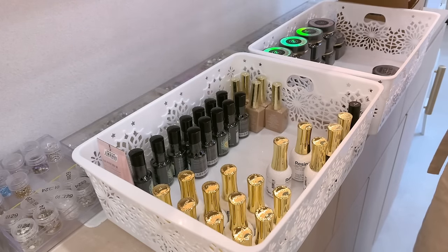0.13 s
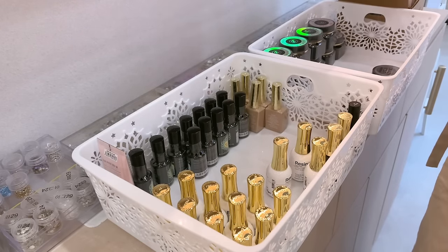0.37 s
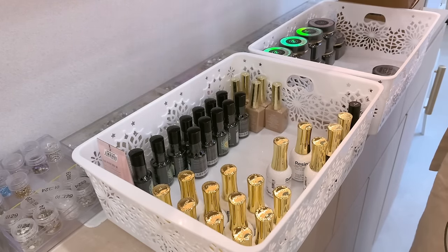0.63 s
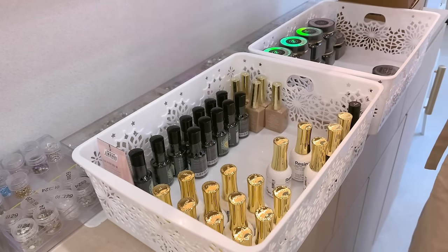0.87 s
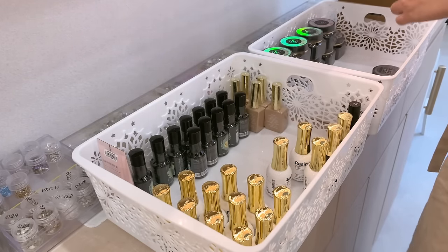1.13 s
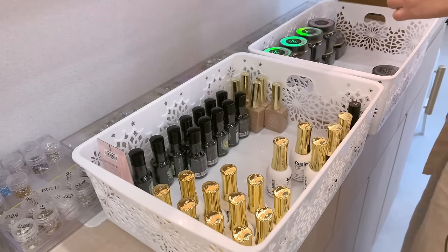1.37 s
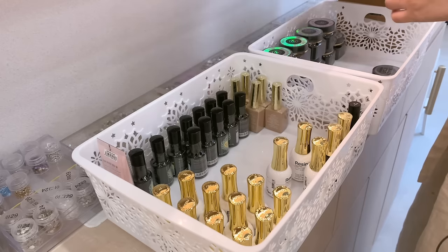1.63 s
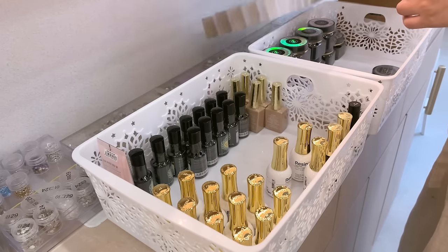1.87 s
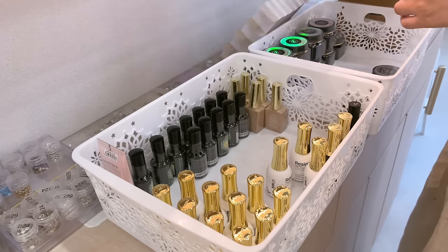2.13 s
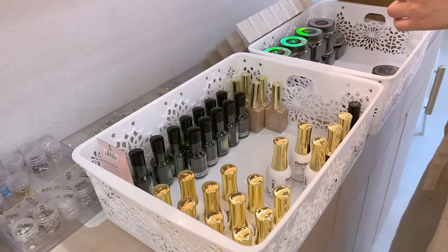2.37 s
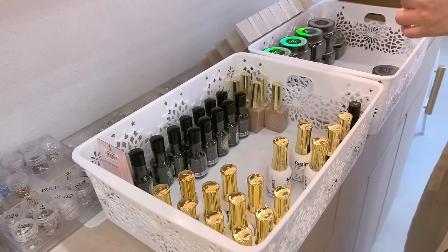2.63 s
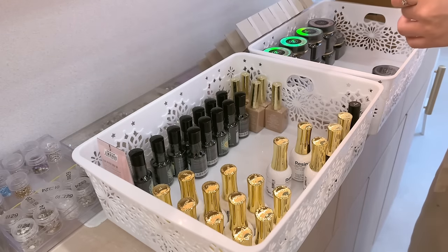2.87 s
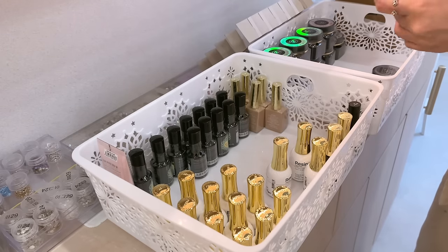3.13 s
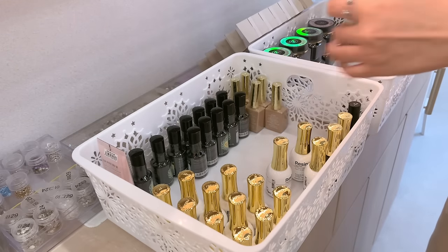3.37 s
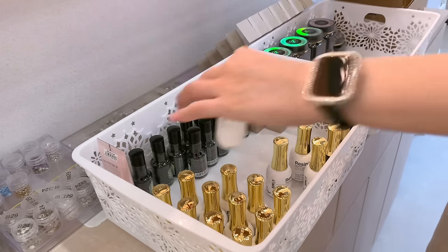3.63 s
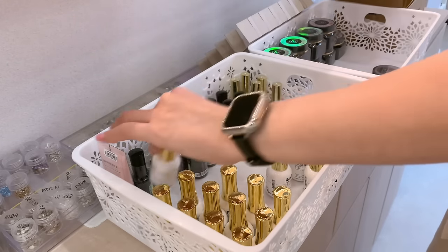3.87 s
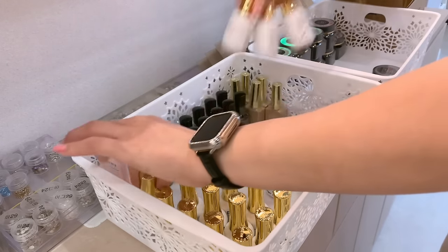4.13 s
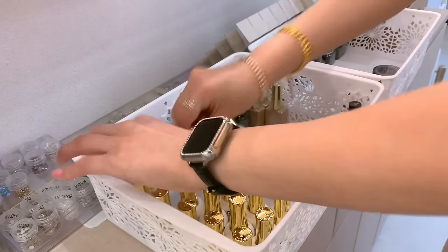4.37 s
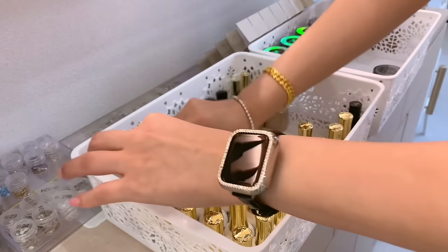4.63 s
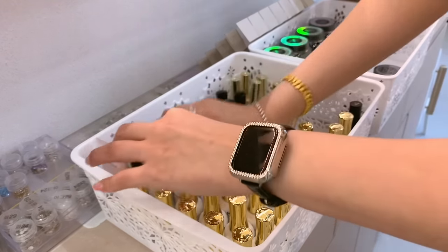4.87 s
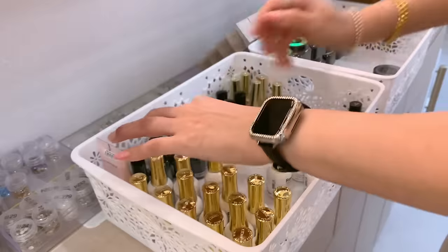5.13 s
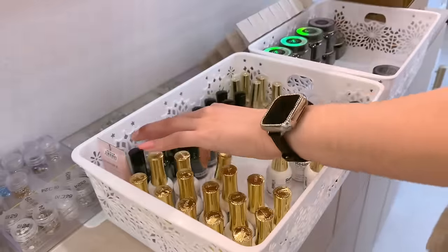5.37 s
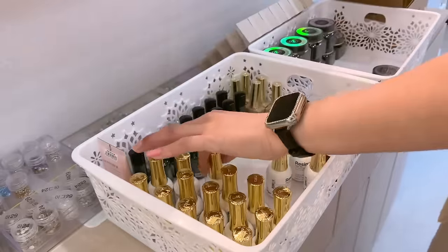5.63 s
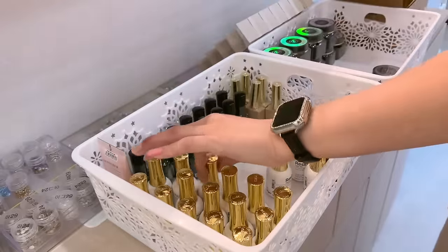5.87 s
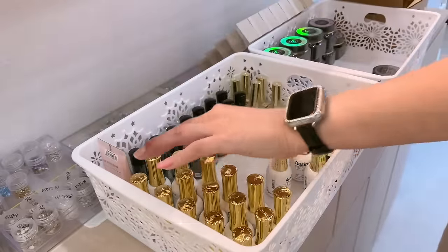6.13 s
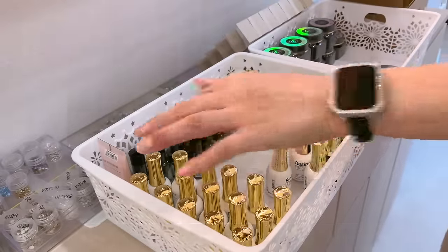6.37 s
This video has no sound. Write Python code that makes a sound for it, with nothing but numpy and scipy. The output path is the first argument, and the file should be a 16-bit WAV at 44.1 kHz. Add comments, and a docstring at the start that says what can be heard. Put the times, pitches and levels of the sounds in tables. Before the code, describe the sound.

Small thick glass bottles clink lightly during rustling and dull carton bumps, then clatter loudly into a plastic basket, followed by quieter ticks and handling.

```python
"""Glass bottles into a basket

Small thick glass bottles are taken from a carton and set down in a plastic basket, close to a phone.
Glass ticks, carton and basket knocks and counter thuds are noisy contacts ringing banks of resonances.
Hands and packing rustle as gated, coloured noise with small glassy ticks; some slides squeak.
A small hard room answers with a diffuse tail, over quiet air and rumble. The loudest knocks overload the input.
"""
import sys
import numpy as np
from scipy import signal
from scipy.fft import rfft, irfft, next_fast_len
from scipy.io import wavfile
from scipy.ndimage import uniform_filter1d, map_coordinates

SR = 44100
rng = np.random.default_rng(int(sys.argv[2]) if len(sys.argv) > 2 else 0)


def invert_db(level):
    """Linear amplitude ratio for a level in decibels (20 dB per decade), elementwise."""
    return 10 ** (np.asarray(level, dtype=float) / 20)


def master(y):
    """Save y as 16-bit WAV."""
    cut = np.clip(np.atleast_2d(y).T, -1, 1)
    pcm = np.round(cut * 32767)  # scale
    wavfile.write(sys.argv[1], SR, pcm.astype(np.int16))


N = 286800  # length of the scene [samples]
BLOW = 8192  # room for one blow to ring [samples]

# clear ticks of glass on glass:
# (time [s], peak before sheen [dB], favoured pitch [Hz], sheen peak over body peak [dB])
CLINKS = [(0.1036, -29, 3560, -17), (0.3129, -16, 2624, -30.5), (0.3577, -21.5, 3330, -25.5),
          (0.5007, -23, 3130, -48), (0.515, -24.5, 3130, -31), (0.6038, -40.5, 2370, 16.5),
          (1.1998, -18.5, 3320, -40), (1.2432, -22.5, 2400, -34), (1.3313, -25, 3300, -39),
          (1.374, -39, 5850, -5), (1.389, -27.5, 3300, -52), (1.585, -35.5, 3400, -14),
          (1.979, -27.5, 3730, -17), (2.391, -33, 4160, -36), (2.608, -26.5, 2460, -17.5),
          (2.7161, -19.5, 2840, -35), (2.7374, -29.5, 2510, -15), (2.987, -25, 3240, -38),
          (3.011, -27, 3290, -39), (3.0781, -7, 3580, -7.5), (3.098, -17.5, 3400, -29),
          (3.2047, -15, 3400, -32), (3.336, -18.5, 3180, -32), (3.9764, -39.5, 3300, -26),
          (4.0234, -6, 3330, -46), (4.0687, -11.5, 4460, -43.5), (4.093, -21, 4330, -36.5),
          (4.18, -32, 2750, -47.5), (4.262, -16, 2860, -31.5), (4.2729, -11, 2930, -8),
          (4.3023, -21.5, 5330, -15.5), (4.356, -7.5, 3750, -36.5), (4.3656, -10.5, 3370, -32),
          (4.3788, -7.5, 3170, -45), (4.3976, -18.5, 2480, -25.5), (4.4063, -17, 2780, -5.5),
          (4.426, -26, 3400, -12), (4.4393, -20.5, 3040, -29), (4.4721, -21.5, 3360, -24.5),
          (4.4851, -21.5, 3720, -16), (4.5095, -9, 4140, -14.5), (4.5424, -39, 5450, -5.5),
          (4.585, -21.5, 3120, -35), (4.6579, -0.5, 2415, -6.5), (4.7153, -11.5, 4680, -6.5),
          (4.7503, -9, 3190, -23.5), (4.7702, -8.5, 2600, -6), (4.7853, -26.5, 2660, -8.5),
          (4.8912, -6.5, 3550, -17.5), (4.9018, -16, 3200, -31), (4.9219, -19, 3380, -31.5),
          (4.9504, -21.5, 3250, -29), (5.0627, -18.5, 4500, -12), (5.0817, -36, 3270, -33),
          (5.1275, -31.5, 3290, -32), (5.1602, -32, 2280, -17), (5.3375, -35, 3290, -35),
          (5.36, -30, 2980, -22), (5.3764, -34, 2860, -33.5), (5.4018, -38.5, 3200, -37),
          (5.4583, -26, 3200, -29), (5.7879, -18.5, 2350, -28), (5.8216, -11, 2870, -20.5),
          (5.8452, -19, 2740, -33), (5.9587, -22, 3270, -26), (6.0568, -25.5, 3360, -25),
          (6.1756, -23.5, 3540, -32.5), (6.1988, -27, 3330, -29)]
# carton bumped on the counter: (time [s], peak level [dB], favoured pitch [Hz], contact time [ms])
CARTON_KNOCKS = [(0.149, -27.5, 409, 1.9), (0.283, -20, 409, 3.4), (0.313, -17.5, 395, 7.4),
                 (0.429, -14.5, 409, 9.4), (0.514, -20, 696, 14), (0.562, 0, 614, 1.7),
                 (1.247, -22.5, 420, 4.1), (1.658, -26, 448, 8.1), (1.925, -29, 437, 9.1),
                 (1.981, -30, 371, 13), (2.059, -20.5, 470, 1.8), (2.201, -26.5, 646, 10),
                 (2.32, -33.5, 253, 5.2), (2.391, -22, 526, 6.1), (2.426, -27, 560, 9.2),
                 (2.456, -24.5, 250, 9.9), (2.477, -25.5, 358, 2.4), (2.505, -20.5, 684, 7),
                 (2.647, -20, 420, 2.5), (2.819, -28.5, 568, 2.4), (3.095, -15.5, 417, 1.9),
                 (3.202, -24, 433, 4.7), (3.397, -22.5, 464, 3.3), (3.42, -28, 427, 16)]
# bottles landing on the basket floor: (time [s], peak level [dB], favoured pitch [Hz], contact time [ms])
BASKET_KNOCKS = [(4.023, -22, 326, 18), (4.271, -8, 580, 11), (4.357, -16, 322, 13), (4.382, -1, 384, 4.3),
                 (4.407, -2.5, 626, 9.2), (4.488, -17, 346, 2.2), (4.658, 14, 664, 4.7),
                 (4.715, 2.5, 645, 9.1), (4.77, 6.5, 670, 3.9), (4.946, -20, 250, 8.3),
                 (4.991, -20.5, 296, 12), (5.061, -22, 581, 6.3), (5.158, -28, 281, 9.5),
                 (5.644, -27, 670, 11.6), (5.859, -15.5, 600, 7.8), (6.045, -30, 355, 4.3),
                 (6.327, -33.5, 1060, 9.2)]
# weight coming down on the counter: (time [s], peak level [dB])
COUNTER_THUDS = [(0.225, -27.5), (0.282, -13), (0.312, -12), (0.429, -19.5), (0.514, -22.5), (1.07, -27.5),
                 (1.247, -27.5), (1.658, -25.5), (2.059, -30.5), (2.456, -18.5), (4.023, -22.5),
                 (4.271, -19.5), (4.381, -16), (4.487, -25), (4.715, -14.5), (4.77, -18), (5.06, -27.5),
                 (5.859, -27), (6.327, -27)]

# resonances of each body, levels relative: (centre [Hz], width [Hz], level [dB])
GLASS_MODES = [(1450, 1100, -6), (2350, 565, -3), (3290, 370, 1.5), (4050, 650, -2), (4765, 930, -2.5),
               (5850, 1450, -3.5), (6780, 1400, -9)]
CARTON_MODES = [(260, 360, -29), (421.4, 36, 8.5), (560, 253, 6), (689, 270, 6.5), (844, 30, -10.5),
                (1305, 40, -32), (1610, 390, -19.5), (2300, 270, -12.5)]
BASKET_MODES = [(250, 70, -2.5), (365, 62, 0), (670, 74, 0), (1014, 120, -8), (1155, 76, -9),
                (1610, 70, -5), (2230, 300, -31.5)]
COUNTER_MODES = [(148.3, 87, 0)]
# broad treble that brightens a clink: (centre [Hz], width [Hz], level [dB])
SHEEN_MODES = [(9550, 7300, 0.16), (13500, 1700, -1.6)]

# strokes of hands and packing rubbing: (time [s], length [ms], starting scrape level [dB])
RUB_STROKES = [(0, 34.5, -38.5), (0.026, 110, -51), (0.127, 53, -44), (0.191, 54, -52.5),
               (0.264, 41, -38.5), (0.312, 17.8, -26.5), (0.334, 90, -41.5), (0.425, 26, -36),
               (0.483, 65, -36.5), (0.557, 27, -33.5), (0.61, 480, -64.5), (1.01, 38, -58),
               (1.045, 47, -35.5), (1.088, 99, -42), (1.655, 22, -46.5), (1.692, 121, -46.5),
               (1.925, 406, -59.5), (1.961, 75, -44), (2.042, 64, -43.5), (2.139, 63, -47),
               (2.2, 114, -54.5), (2.389, 17.5, -35), (2.41, 1120, -60), (2.428, 120, -42.5),
               (2.563, 140, -43), (2.7, 81, -50.5), (2.77, 87, -54.5), (2.87, 200, -50.5), (3.09, 37, -48),
               (3.22, 183, -57.5), (3.4, 65, -45), (3.462, 66, -40.5), (4.356, 60, -33), (4.558, 17, -35.5),
               (4.743, 13, -22), (4.9, 53, -39.5), (4.947, 26, -43.5), (5.243, 24.2, -45),
               (5.641, 11.4, -29.5), (5.705, 19.2, -39), (5.777, 50.5, -40), (5.822, 33, -33),
               (5.861, 58, -41.5), (5.912, 91, -51), (6.034, 90, -43), (6.205, 138, -49.5),
               (6.326, 36, -45.5)]
# extra treble hiss in the rubbing: (time [s], length [ms], starting hiss level [dB])
EXTRA_HISS = [(0.126, 51, -53), (1.17, 25, -54), (1.621, 52, -48.5), (2.77, 84, -59.5), (3.462, 64, -54),
              (4.4, 38, -54), (4.9, 53, -50.5), (5.861, 57, -51), (6.035, 82, -58)]
# things dragged over the counter: (time [s], length [ms], starting drag level [dB])
DRAGS = [(0.334, 53, -28.5), (0.44, 54, -45), (0.557, 24, -20.5), (1.176, 38, -38.5), (1.696, 13, -32),
         (2.056, 52, -45.5), (2.238, 70, -41.5), (2.428, 120, -31.5), (2.563, 130, -39), (2.982, 220, -44),
         (3.35, 87, -35.5), (4.947, 41, -36), (5.24, 90, -50), (5.36, 110, -45.5), (5.704, 27, -37.5),
         (5.912, 110, -43), (6.114, 88, -44), (6.325, 43, -37)]
# squeaky slides: (time [s], length [ms], pitch [Hz], level [dB])
SQUEAKS = [(2.87, 220, 2460, -51.5), (3.458, 79, 880, -42.5), (4.561, 14.7, 2580, -31),
           (4.746, 5.95, 3100, -22.5), (6.235, 87, 1078, -47.5), (6.327, 27, 1040, -38)]

# noise colours, levels relative: (frequency [Hz], level [dB])
SCRAPE_COLOUR = [(700, -29.5), (1300, -1.5), (2400, -0.5), (3400, -4.5), (5400, -9.5), (7500, -23),
                 (11000, -40.5)]
HISS_COLOUR = [(3500, -46), (7000, -5), (10000, -7.5), (15000, -9.5), (16500, -28)]
DRAG_COLOUR = [(70, -50.5), (140, -1), (290, -5), (430, 3.5), (580, 1.5), (750, -6.5), (950, -3),
               (1250, -5.5), (3000, -66.5)]
AIR_COLOUR = [(88, -29.5), (150, -5), (222, -16.5), (309, -21), (466, -23), (905, -24), (1290, -34),
              (1690, -37.5), (3620, -46), (16000, -62)]
RUMBLE_COLOUR = [(1, 10.5), (3, 21.5), (8, 13), (30, 0.5), (60, -1.5), (80, -13.5), (120, -8), (250, -48.5)]
# colour of the echo as it starts, levels relative: (frequency [Hz], level [dB])
WALL_COLOUR = [(150, 4), (300, -1), (900, -5), (1500, -3), (4000, -7), (7000, -6.5), (11000, -9.5)]
# how long the room rings: (frequency [Hz], time to fall by 60 dB [s])
ROOM_DECAY = [(150, 0.67), (700, 0.85), (2500, 0.74), (6000, 0.54), (14000, 0.6)]


def unit(x):
    """Scale to rms 1."""
    return x / np.sqrt(np.mean(x ** 2) + 1e-20)


def along(points, hz):
    """Read a curve of (frequency, value) points on a log frequency axis."""
    f, value = np.transpose(points)
    return np.interp(np.log(hz + 1), np.log(f + 1), value)


def wobble(rate):
    """A smooth random curve with rate knots a second."""
    knots = rng.standard_normal(int(N * rate / SR) + 4)
    return map_coordinates(knots, [np.arange(N) * rate / SR])


def noise(colour):
    """Noise of rms 1, filtered to a colour."""
    m = next_fast_len(N)
    gain = invert_db(along(colour, np.fft.rfftfreq(m, 1 / SR)))
    return unit(irfft(rfft(rng.standard_normal(m)) * gain, m)[:N])


def chatter(ms, shape, rise, snap, linger_db, count):
    """A few ms of uneven contact with a weaker rattle after it, evened out over pitch count times."""
    u = np.arange(BLOW // 4) / SR * 1000 / max(ms, .5)  # time in contact times
    envelope = u ** rise * (np.exp(-u ** shape) + invert_db(linger_db) * np.exp(-u / 6.2))
    push = envelope * rng.standard_normal(len(u))
    push[0] += snap  # first sharp touch
    for _ in range(count):
        spectrum = rfft(push)
        flat = irfft(spectrum / (np.abs(spectrum) + 1e-9), len(u))
        push = np.sqrt(envelope + (u == 0)) * flat
    return push


def ring(push, modes, lift_db, soft_hz):
    """A push, dulled by the softness of the contact, through causal resonances, scaled to peak 1."""
    f = np.fft.rfftfreq(BLOW, 1 / SR)
    body = 0
    for k, ((centre, width, db), lift) in enumerate(zip(modes, lift_db)):
        resonance = 1j * f * width / (centre * centre - f * f + 1j * f * width)
        body = body + (-1) ** k * invert_db(db + lift) * resonance  # neighbours in opposite polarity
    softness = 1 / (1 + 1j * f / soft_hz) ** 2
    out = irfft(rfft(push, BLOW) * body * softness, BLOW)
    return out / np.abs(out).max()


def blows(table, modes, focus_db, scatter_db, soft_hz, detune=0, **touch):
    """Each contact rings the body, losing focus_db per octave from its pitch; any treble dB adds sheen."""
    modes = np.array(modes)
    out = np.zeros(N + BLOW)
    for s, db, hz, ms, *treble_db in table:
        push = chatter(ms, **touch)
        octaves = np.log2(modes[:, 0] / hz)
        lift_db = -focus_db * np.abs(octaves) + scatter_db * rng.standard_normal(len(modes))
        # resonances shift at random from blow to blow, by detune
        shifted = modes * [[1 + detune * r, 1, 1] for r in rng.standard_normal(len(modes))]
        sound = ring(push, shifted, lift_db, soft_hz)
        for treble in treble_db:
            sound = sound + invert_db(treble) * ring(push, SHEEN_MODES, np.zeros(len(SHEEN_MODES)), soft_hz)
        out[round(s * SR):][:BLOW] += invert_db(db) * sound
    return out[:N]


def glass_clinks():
    """Hard 1.8 ms touches ring thick glass, its resonances shifting a little from clink to clink."""
    touches = [(s, db, hz, 1.8, treble) for s, db, hz, treble in CLINKS]
    return blows(touches, GLASS_MODES, focus_db=8.5, scatter_db=3.5, detune=0.046, soft_hz=15400,
                 shape=0.75, rise=.03, snap=1.0, linger_db=-9.0, count=1)


def basket_knocks():
    """Bottles meet the plastic floor: soft contacts ring the basket with a faint rattle."""
    return blows(BASKET_KNOCKS, BASKET_MODES, focus_db=6.5, scatter_db=1.5, soft_hz=1570,
                 shape=1.7, rise=0.21, snap=0.87, linger_db=-34.5, count=2)


def carton_knocks():
    """Soft bumps ring the carton, strongly favouring one pitch, with a clear rattle after."""
    return blows(CARTON_KNOCKS, CARTON_MODES, focus_db=15, scatter_db=2.0, soft_hz=1600,
                 shape=1.6, rise=0.3, snap=0.47, linger_db=-10.0, count=2)


def counter_thuds():
    """Weight coming down, 5.35 ms of contact, rings the counter's single low resonance."""
    touches = [(s, db, COUNTER_MODES[0][0], 5.35) for s, db in COUNTER_THUDS]
    return blows(touches, COUNTER_MODES, focus_db=0, scatter_db=0, soft_hz=1500,
                 shape=1.75, rise=0.3, snap=0.392, linger_db=-11.5, count=2)


def gate(s, ms, sag_db):
    """Opens fast, sags over the first 22 ms, then closes; longer strokes have softer edges."""
    t = (np.arange(N) / SR - s) * 1000
    opening = t / (2.0 + 0.076 * ms)
    closing = (ms - t) / (4 + 0.13 * ms)
    edges = np.clip(np.minimum(opening, closing), 0, 1)
    return edges * invert_db(-sag_db * np.clip(t / 22, 0, 1))


def strokes(rows):
    """Summed gain of strokes, each (time [s], length [ms], level [dB])."""
    return sum(invert_db(db) * gate(s, ms, sag_db=4.5) for s, ms, db in rows)


def patches(x, patchy_db):
    """Random louder and softer patches in time and pitch."""
    z = signal.stft(x, nperseg=256)[2]
    field = uniform_filter1d(uniform_filter1d(rng.standard_normal(z.shape), 5, 0), 7, 1)
    return signal.istft(z * invert_db(patchy_db * unit(field)), nperseg=256)[1][:N]


def rubbing_ticks(rubbed):
    """Small random touches while things rub, each waking mostly one glass resonance."""
    rate = 150  # ticks a second
    over_scrape_db = 5 + 4.5 * np.minimum(rng.exponential(size=N), 2.5)
    touches = (rng.random(N) < rate / SR) * invert_db(over_scrape_db) * rubbed
    modes = np.arange(len(GLASS_MODES))
    which = rng.integers(len(modes), size=N)
    ticks = 0
    for k in modes:
        tick = ring(np.ones(1), GLASS_MODES, 14 * (modes == k), soft_hz=9000)
        ticks = ticks + signal.fftconvolve(touches * (which == k), tick)
    return ticks[:N]


def rustle():
    """Rubbing as scrape, hiss and drag noise with a partly shared gritty flutter, and ticks riding on it."""
    # a stroke of -41.5 dB hisses at -52 dB, and hiss grows 0.75 dB per dB of scrape
    hiss_strokes = [(s, ms, -52 + .75 * (db + 41.5)) for s, ms, db in RUB_STROKES]
    # the carton skids a little at each bump
    skids = [(s, 17.1, db - 15.5) for s, db, *_ in CARTON_KNOCKS]
    rubbed = strokes(RUB_STROKES)
    hissed = strokes(hiss_strokes + EXTRA_HISS)
    dragged = invert_db(0.5) * rubbed + strokes(DRAGS + skids)

    flutter_db = 1.2 * wobble(45) + 2.2 * wobble(200)
    scrape_db = flutter_db + 1.0 * wobble(130)
    hiss_db = 1.2 * flutter_db + 1.5 * wobble(150)
    drag_db = 0.38 * flutter_db + 4.5 * wobble(60)
    scrape = unit(invert_db(scrape_db) * patches(noise(SCRAPE_COLOUR), patchy_db=3.5))
    hiss = unit(invert_db(hiss_db) * patches(noise(HISS_COLOUR), patchy_db=1.2))
    drag = unit(invert_db(drag_db) * noise(DRAG_COLOUR))
    return rubbed * scrape + hissed * hiss + dragged * drag + rubbing_ticks(rubbed)


def squeaks():
    """Some slides catch one resonance: a narrow, unsteady band of noise."""
    out = np.zeros(N)
    for s, ms, hz, db in SQUEAKS:
        band = [(hz * .75, -35), (hz * .93, -5), (hz, 0), (hz * 1.07, -5), (hz * 1.3, -35)]
        unsteady = unit(invert_db(5.5 * wobble(70)))
        out += invert_db(db) * gate(s, ms, 0) * unsteady * noise(band)
    return out


def room(x):
    """A diffuse tail, each frequency dying at its own speed, new for every 0.3 s of sound."""
    out, step = np.zeros(N + 3 * SR), int(.3 * SR)
    for at in range(0, N, step):
        hz, t, z = signal.stft(rng.standard_normal(SR), SR, nperseg=256)
        decay_db = along(WALL_COLOUR, hz)[:, None] - 60 * t / along(ROOM_DECAY, hz)[:, None]
        tail = signal.istft(z * invert_db(decay_db), SR, nperseg=256)[1]
        wet = signal.fftconvolve(x[at:at + step], tail / np.linalg.norm(tail))
        out[at + 300:][:len(wet)] += wet  # the echo starts 300 samples late
    return out[:N]


def background():
    """Quiet room air over a slow, lumpy rumble, both coloured noise."""
    lumps_db = 1.3 * wobble(1.5) + .9 * wobble(7)
    return invert_db(-55.5) * noise(AIR_COLOUR) + invert_db(-36.0 + lumps_db) * noise(RUMBLE_COLOUR)


def scene():
    """Everything near the phone, its echo and the room, as one channel."""
    glass, basket = glass_clinks(), basket_knocks()
    carton, counter = carton_knocks(), counter_thuds()
    rubbing = rustle() + squeaks()
    knocks_to_room = invert_db(-15.5) * basket + invert_db(-14.5) * carton + invert_db(-12) * counter
    echo = room(invert_db(-15.0) * glass + knocks_to_room + invert_db(-10.0) * rubbing)
    return (glass + basket + carton + counter + rubbing + echo + background())[None]


def low_pass(x):
    """Removes everything above the highest recorded frequency."""
    return signal.sosfilt(signal.butter(12, 16440, fs=SR, output="sos"), x)


def record(dry):
    """A gentle low-pass takes off the top treble; the input clips almost flat at full scale."""
    heard = signal.sosfilt(signal.butter(4, 15500, fs=SR, output="sos"), dry)
    clipped = heard / (1 + np.abs(heard / .99) ** 8) ** (1 / 8)
    return low_pass(clipped)


dry = scene()
out = record(dry)
master(out)
```